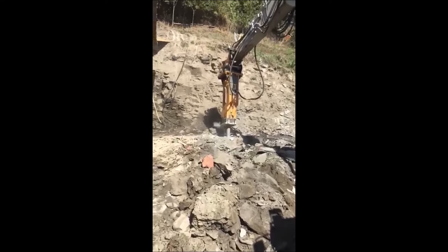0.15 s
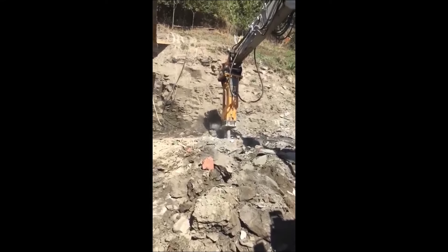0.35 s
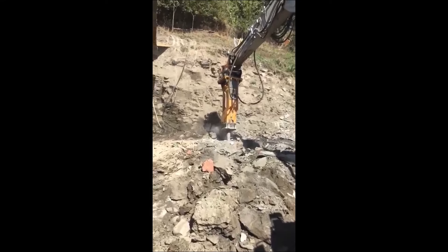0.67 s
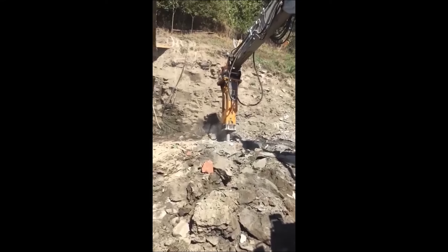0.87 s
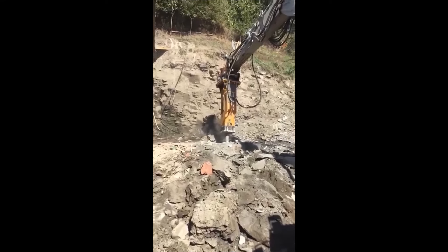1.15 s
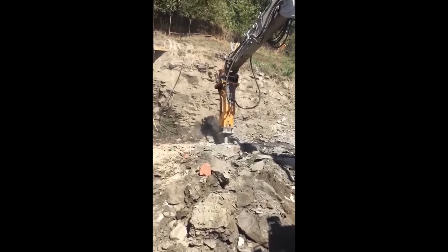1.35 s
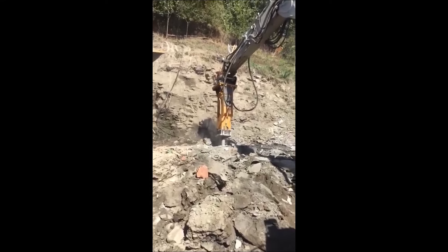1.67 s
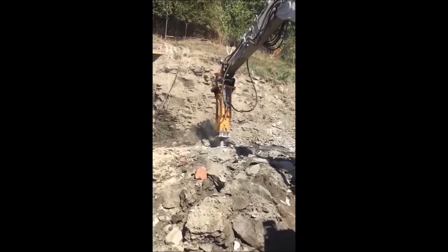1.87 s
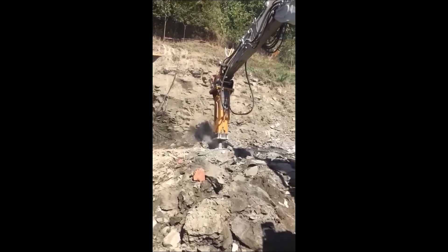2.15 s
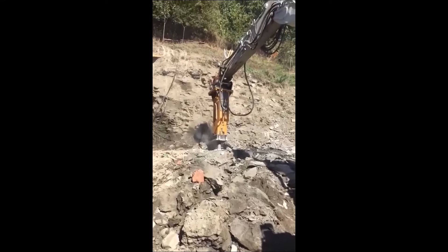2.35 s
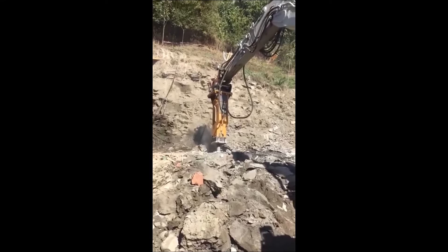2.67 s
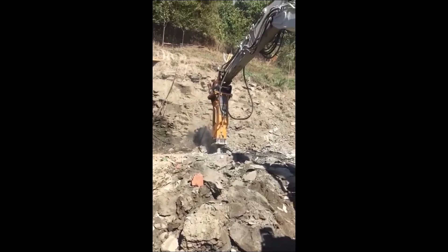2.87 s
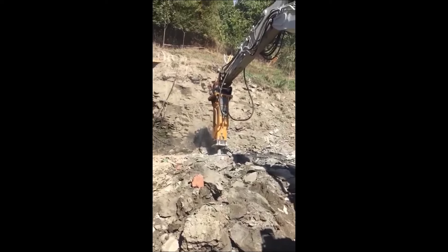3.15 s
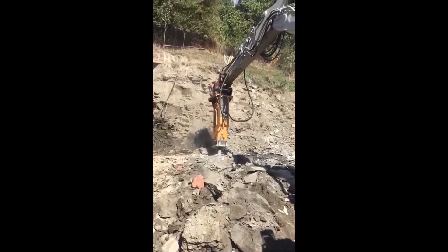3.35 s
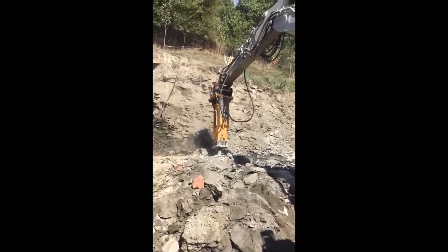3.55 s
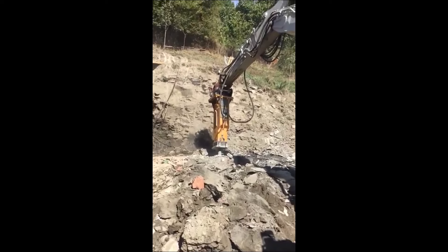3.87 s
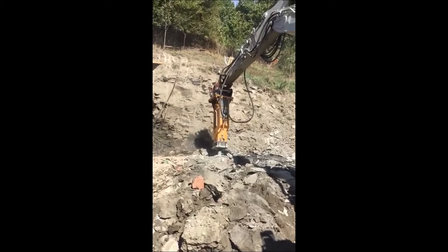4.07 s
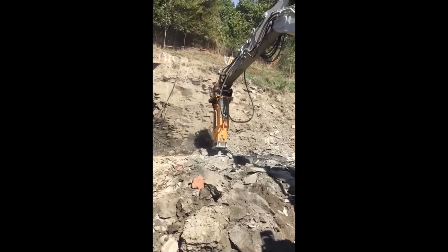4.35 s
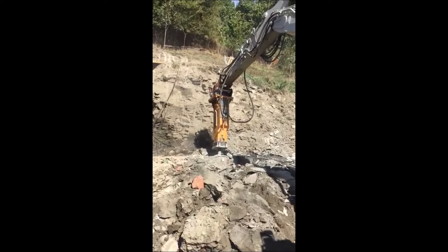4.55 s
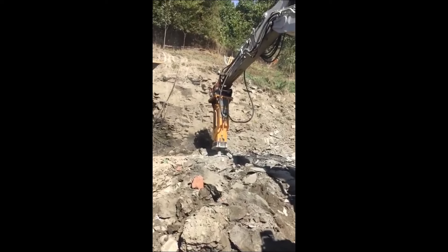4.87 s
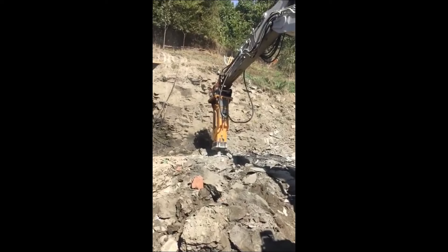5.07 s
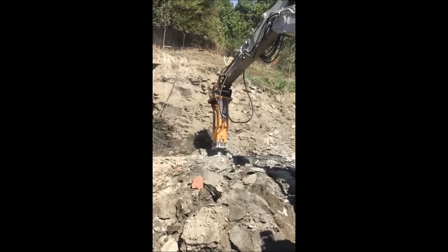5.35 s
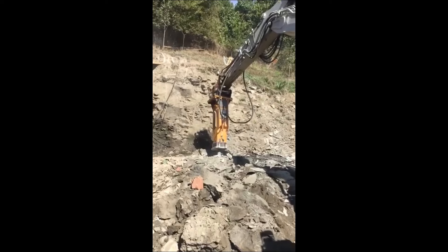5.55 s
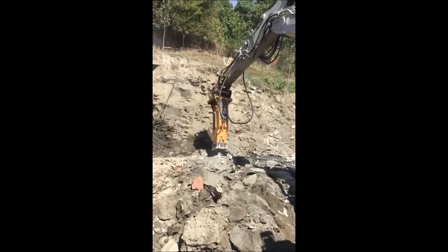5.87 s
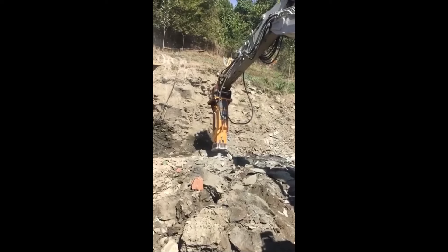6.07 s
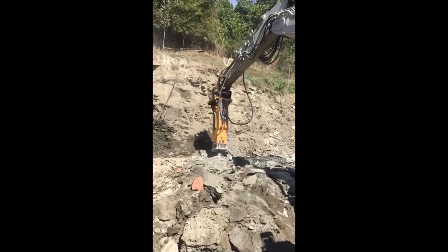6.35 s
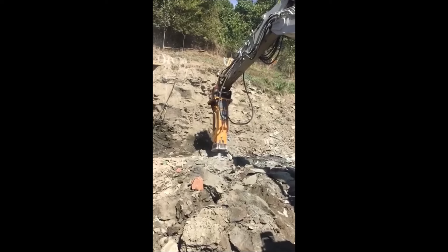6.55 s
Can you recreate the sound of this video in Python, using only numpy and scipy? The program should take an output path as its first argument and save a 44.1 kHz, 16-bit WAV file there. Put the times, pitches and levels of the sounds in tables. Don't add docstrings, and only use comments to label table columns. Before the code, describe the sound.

A hydraulic breaker on a small excavator hammers rock about eight times a second, metallic and clattering, over a droning diesel and hissing oil.

```python
import sys
import numpy as np
from scipy import signal
from scipy.fft import rfft, irfft
from scipy.io import wavfile
from scipy.ndimage import uniform_filter1d, minimum_filter1d

SR = 44100
rng = np.random.default_rng(int(sys.argv[2]) if len(sys.argv) > 2 else 0)


def elevation(decibels):
    levels = np.asarray(decibels, float)
    return 10 ** (levels / 20)


def to_wav(s):
    ch = np.atleast_2d(s).T
    pcm = np.round(np.clip(ch, -1, 1) * 32767)
    wavfile.write(sys.argv[1], SR, pcm.astype(np.int16))


N = 295891
RING = int(.24 * SR)
AGE = np.arange(RING) / SR

# pitch_hz, level_db
DRONE_SPECTRUM = [(18, -38), (30, -6), (157, 4), (422, -5), (514, 0.5), (1050, -19.5), (1720, -27),
                  (2500, -29.5), (3900, -31), (4750, -36.5), (5650, -26.5), (8590, -39.5), (11000, -37.5),
                  (14300, -84), (22000, -120)]
# time_s, level_db, centre_hz
OIL_HISS = [
    (0, -46, 3800),
    (.3, -43.5, 3730),
    (1.002, -42, 3764),
    (1.6, -40.5, 3700),
    (1.898, -50.5, 3637),
    (4.6, -55, 3640),
    (5.2, -47, 3764),
    (6.201, -48.5, 3750),
    (6.71, -41, 3670),
]
# offset_hz, level_db
OIL_BAND = [(60, 0.5), (190, -1.5), (360, -20), (900, -37.5)]
# pitch_hz, level_db
OIL_WASH = [(2500, -1.0), (3500, -6), (5000, -10), (6500, -15), (9000, -41)]

# first_blow_s, period_s, blows
STEADY_RUNS = [
    (.0242, .12018, 14),
    (2.2152, .12, 12),
    (3.6551, .11933, 12),
    (5.087, .1189, 5),
    (5.6815, .11963, 9),
]
# time_s, extra_db
LABOURED_BLOWS = [
    (1.711, 2),
    (1.8472, 2),
    (1.9748, 1.5),
    (2.0966, 1),
]
# time_s, boom_bite_db, housing_slack_db, ground_hardness_db
CHISEL_CONTACT = [(0, -2, 1.5, 4), (.4, -13, -1, 3.5), (.7, 1, -14, 5), (1.35, 0, -6, 6.5),
                  (1.56, -7, -12, 1), (1.72, -7, 0, 3.5), (1.85, 4, -6, -9), (2.1, -1.5, -7, 1),
                  (2.331, -5.5, -10, 3), (2.6, 0, -4.5, -1), (3.3, 4.5, -2, 0.5), (3.75, 2, -2.5, -.5),
                  (4.4, 1.5, 2, -1.5), (4.95, 6, 2, 3.5), (5.25, 4.5, 5, 0.5), (5.7, 0, 2, -2.5),
                  (6.3, 4.5, -2, -0.5), (6.55, 3, -5, -1.5)]
PART_SCATTER = [3, 1.15, 3.2, 2.6]
SEATINGS = [
    .8,
    2.7,
    5.1,
]

# pitch_hz, first_seating_db, second_seating_db,
# third_seating_db
STEEL_MODES = [(871,-19,-1.5,-15.5),(913.4,-9,-3.5,-10.5),(1086,-14.5,-10,-20.5),(1231,-17.5,-5,-7.5),(1320,-10,-4,2.5),(1384,-6,-13,-2),(1442,-3,-6,-6.5),(1546,-5,4,-32),(1707,-3.5,-1,0),(1875,-12.5,-6,-1.5),(2091,-17.5,-18.5,-16.5),(2706,-7.5,-5.5,-15.5),
               (3067,-18.5,-9,-11.5),(3223,-32,-9,-17.5),(3450,-47,-24,-23),(3731,-25,-9,-8.5),(3900,-7.5,-3,-1.5),(4120,-9,-6.5,-17),(4230,-6.5,-2.5,-3),(4393,-20,-8.5,-5.5),(5370,-5.5,-11,-13.5),(5560,-5,-4.5,-17.5),(5910,-8.5,-10,-6),
               (6800,-20,-16,-32),(6980,0,0,-47),(7210,-22,-9,-9),(7510,-14,-14,-6.5),(8650,-10,3.5,-24),(8536,4,-27,0.5),(9920,-8.5,-15,-14)]
# pitch_hz, t60_s
STEEL_DECAY = [(900, 0.097), (1350, 0.036), (1800, 0.088), (2700, 0.097), (3300, .09), (4000, 0.09),
               (6000, 0.052), (8500, 0.026)]
# pitch_hz, arrival_ms
STEEL_FILL = [(900, 4), (1250, .6), (1800, .5), (2700, .8), (3200, 9), (3800, 4), (4200, .8), (8000, .3)]
# pitch_hz, t60_s, arrival_ms, first_seating_db, second_seating_db, third_seating_db
BOOM_MODES = [(502.8, 0.21, 3.5, -2.5, 0.5, -4.5), (553, 0.13, 4.9, -0.5, -1.5, -5),
              (618, 0.34, 12, -6.5, -37, -20), (605, 0.038, 1.4, -5, -33, -2),
              (701, 0.071, 15, -11, -37, -17)]
HOUSING_MODES = [(330.6, 0.045, 14.7, 2.5, 2.5, 3.5), (411.5, 0.1, 12, -23, -13, -11)]
GROUND_MODES = [(131, 0.23, 30, -25, -49, -38.5), (91.2, 0.031, 29, -0.5, 5.5, 7.5),
                (158.5, 0.08, 58, -3.5, 6, 3.5), (205, 0.13, 5.8, -3.5, 1, -6),
                (260.5, 0.061, 22, -5, -13, -1.5)]
# pitch_hz, level_db (per Hz)
CLATTER_SPECTRUM = [(500, -6), (800, -10), (1040, -12.5), (1700, -13), (2440, -14.5), (3300, -12.5),
                    (4040, -7.5), (4800, -17.5), (5530, -11.5), (7000, -16), (7950, -20.5), (8730, -20),
                    (10200, -32), (12000, -43.5)]
CRACK_SPECTRUM = [(900, -38), (1500, 23), (3000, -44), (6000, -24.5), (8500, 7), (10500, -7), (12000, 2.5),
                  (13500, -58)]
KNOCK_SPECTRUM = [(700, -20.5), (1500, 5), (2500, -6), (3300, -1), (4200, -0.5), (6500, -8), (9000, -8.5),
                  (12000, -16)]
# pitch_hz, t60_s
CLATTER_DECAY = [(400, 0.34), (1000, 0.25), (2500, 0.23), (4000, 0.17), (6500, 0.12), (9500, 0.11)]
KNOCK_DECAY = [(500, 0.092), (9000, 0.57)]

# low_hz, high_hz, threshold_db
MUTED_BANDS = [(7800, 8300, -64), (8800, 9400, -67), (9400, 10100, -64), (10100, 10700, -61),
               (10700, 11300, -58), (11300, 12000, -66), (12000, 13100, -55), (13100, 17000, -52)]
# low_hz, high_hz, share_of_frames, side_db
FILLED_BANDS = [(1000, 1200, .3, -22), (1300, 1550, .3, -23), (1700, 2000, .35, -23), (2100, 2400, .3, -23),
                (2500, 2800, .35, -23), (2900, 3200, .3, -22), (4100, 4900, .65, -5), (4900, 6200, .9, -2),
                (6200, 7700, .85, -2), (7700, 8800, .7, -3), (8800, 9600, .75, -3), (9600, 10400, .5, -2),
                (11200, 12200, .6, -1)]


def on_log(hz, table):
    f, value = np.transpose(table)
    return np.interp(np.log(np.maximum(hz, 1)), np.log(f), value)


def colour(x, table):
    n = x.shape[-1]
    gain = elevation(on_log(np.fft.rfftfreq(n, 1 / SR), table))
    y = irfft(rfft(x) * gain, n)
    return y / np.sqrt(np.mean(y ** 2))


def fade(t60):
    return np.exp(-np.log(1000) * AGE / t60)


def walk(rate):
    hold = int(SR / rate)
    steps = np.repeat(rng.standard_normal(N // hold + 1), hold)
    return np.sqrt(2) * uniform_filter1d(uniform_filter1d(steps, hold), hold)[:N]


def place(times, rings):
    out = np.zeros(N + RING)
    for s, ring in zip(times, rings):
        i = max(int(s * SR), 0)
        out[i:i + RING] += ring
    return out[:N]


def blow_times():
    runs = [(first + period * k, 0) for first, period, count in STEADY_RUNS for k in range(count)]
    return np.transpose(sorted(runs + LABOURED_BLOWS))


def engine():
    t, blow_s = np.arange(N) / SR, blow_times()[0]
    beat = np.r_[2 * blow_s[0] - blow_s[1], blow_s, 2 * blow_s[-1] - blow_s[-2]]
    blows_done = uniform_filter1d(np.interp(t, beat, np.arange(len(beat))), size=2000, mode="nearest")
    turn = 2 * np.pi * 7 * blows_done
    labour_s, rise_s, fall_s = 1.84, 0.23, .08
    labour = np.exp(-((t - labour_s) / np.where(t < labour_s, rise_s, fall_s)) ** 2)
    firing_db = -36.5 + 10.5 * labour
    firing = np.sqrt(2) * elevation(firing_db) * (np.sin(turn + 1.8) + elevation(-12) * np.sin(2 * turn + .4))
    pump = elevation(-39) * np.sin(9 * turn / 2) + elevation(-45) * np.sin(9 * turn)
    drone = colour(rng.standard_normal(N), DRONE_SPECTRUM)
    drone = drone * (1 + 0.23 * np.cos(turn)) * elevation(0.58 * walk(14))
    return firing + pump * elevation(2 * walk(10)) + elevation(-30.5) * drone


def oil():
    s, *columns = np.transpose(OIL_HISS)
    level_db, centre_hz = (np.interp(np.arange(N) / SR, s, c) for c in columns)
    carrier = np.sin(2 * np.pi * np.cumsum(centre_hz * (1 + .008 * walk(14))) / SR)
    band = np.sqrt(2) * carrier * colour(rng.standard_normal(N), OIL_BAND)
    wash = colour(rng.standard_normal(N), OIL_WASH)
    return elevation(level_db + 1.2 * walk(20)) * (band + elevation(-8) * wash)


def contact(s):
    t, *controls = np.transpose(CHISEL_CONTACT)
    bite, slack, hard = (np.interp(s, t, c) for c in controls)
    chance = rng.standard_normal((len(s), 5)).T
    bright = 2.5 + 0.25 * hard
    parts = np.array([bite, slack, hard, bright])
    force_db = -4.5 - 0.11 * np.maximum(bite, 0) + 0.55 * chance[-1]
    return force_db, *(parts + np.array(PART_SCATTER)[:, None] * chance[:-1])


def modes(times, hz, t60, arrival_ms, seat_db, scatter_db, detune, sag=0):
    rings, start = 0, rng.random(len(hz)) * 2 * np.pi
    chance = rng.standard_normal((len(times), len(hz), 2))
    chance = np.sqrt(3) * uniform_filter1d(chance, size=3, axis=0)
    sag_s = .025
    bent_age = AGE + sag * sag_s * (1 - np.exp(-AGE / sag_s))
    for k, f in enumerate(hz):
        db = np.interp(times, SEATINGS, seat_db[k]) + scatter_db * chance[:, k, 0]
        swell = 1 - np.exp(-(AGE * 1000 / arrival_ms[k]) ** 2)
        shape = swell * fade(t60[k])
        turn = 2 * np.pi * f * np.outer(1 + detune * chance[:, k, 1], bent_age)
        rings = rings + elevation(db)[:, None] * shape / shape.max() * np.sin(turn + start[k])
    return rings


def rattle(count, spectrum, t60s, alike, rise_ms, clump_db):
    keep = np.clip(alike, 0, .98)
    noise = rng.standard_normal((count + 8, RING))
    noise = signal.lfilter([np.sqrt(1 - keep ** 2)], [1, -keep], noise, axis=0)[8:]
    spec, f = rfft(colour(noise, spectrum)), np.fft.rfftfreq(RING, 1 / SR)
    rings = 0
    for hz in 300 * 2 ** np.arange(0, 6, .5):
        share = np.clip(1 - 2 * np.abs(np.log2(np.maximum(f, 1) / hz)), 0, 1)
        steps = np.repeat(rng.standard_normal((count, RING // 128 + 1)), 128, axis=1)
        clumps = uniform_filter1d(steps, size=128)[:, :RING]
        rings = rings + irfft(spec * share, RING) * fade(on_log(hz, t60s)) * elevation(clump_db * clumps)
    return rings * (1 - np.exp(-AGE * 1000 / rise_ms))


def heavy_part(table, times):
    hz, t60, arrival_ms, *seat_db = np.transpose(table)
    return modes(times, hz, t60, arrival_ms, np.transpose(seat_db), scatter_db=.8, detune=.004, sag=0.059)


def ground(s, ground_db):
    thud = elevation(ground_db - 22.5)[:, None] * heavy_part(GROUND_MODES, s)
    push = (AGE / .018) ** 2 * np.exp(2 - 2 * AGE / .018)
    return thud + elevation(-25.0) * push * np.sin(2 * np.pi * 74 * AGE)


def valve_knock(count):
    return elevation(-39.0) * rattle(count, KNOCK_SPECTRUM, KNOCK_DECAY, alike=0.37, rise_ms=0.59, clump_db=5.5)


def steel(s, bright_db):
    hz, *seat_db = np.transpose(STEEL_MODES)
    t60, arrival_ms = on_log(hz, STEEL_DECAY), on_log(hz, STEEL_FILL)
    ring = modes(s, hz, t60, arrival_ms, np.transpose(seat_db), scatter_db=3, detune=.003)
    clatter = rattle(len(s), CLATTER_SPECTRUM, CLATTER_DECAY, alike=.8, rise_ms=3, clump_db=3.2)
    crack = colour(rng.standard_normal((len(s), RING)), CRACK_SPECTRUM) * fade(0.018)
    metal = elevation(-16) * ring + elevation(-12.5) * clatter + elevation(-25.0) * crack
    top = signal.sosfilt(signal.butter(2, 4800, "high", fs=SR, output="sos"), metal)
    return metal + (elevation(bright_db) - 1)[:, None] * top


def breaker():
    s, extra_db = blow_times()
    force_db, boom_db, housing_db, ground_db, bright_db = contact(s)
    boom = elevation(boom_db - 17)[:, None] * heavy_part(BOOM_MODES, s)
    housing = elevation(housing_db - 17.0)[:, None] * heavy_part(HOUSING_MODES, s)
    blow = steel(s, bright_db) + boom + housing + ground(s, ground_db)
    force = elevation(force_db + extra_db)[:, None]
    return place(s - .001, force * blow) + place(s - .0205, force * valve_knock(len(s)))


def scene():
    mid = engine() + oil() + breaker()
    return np.array([mid, mid])


def flickering_bands(x):
    f, _, spec = signal.stft(x, SR, nperseg=1024)
    for low_hz, high_hz, floor_db in MUTED_BANDS:
        band = (f >= low_hz) & (f < high_hz)
        size = np.sqrt(np.sum(np.abs(spec[band]) ** 2, axis=0))
        margin = size / elevation(floor_db + 1.5 * rng.standard_normal(len(size)))
        spec[band] *= margin ** 6 / (1 + margin ** 6)
    side, frames = np.zeros_like(spec), spec.shape[1]
    treble = np.abs(spec[f > 4000]).sum(axis=0)
    calm = (treble < 1.5 * np.roll(treble, 2)) | (rng.random(frames) < .14)
    for low_hz, high_hz, share, side_db in FILLED_BANDS:
        band = (f >= low_hz) & (f < high_hz)
        on = np.repeat(rng.random(frames // 4 + 1) < share, 4)[:frames] & calm
        wander = np.repeat(rng.standard_normal(frames // 2 + 1), 2)[:frames]
        gain = on * elevation(side_db + 3.5 * wander)
        random_phase = np.exp(2j * np.pi * rng.random(spec[band].shape))
        side[band] = gain * np.abs(spec[band]) * random_phase
    return signal.istft(np.array([spec + side, spec - side]), SR, nperseg=1024)[1][:, :N]


def low_pass(x):
    return signal.sosfilt(signal.butter(12, 13100, fs=SR, output="sos"), x)


def record(dry):
    x = signal.sosfilt(signal.butter(4, 42, "high", fs=SR, output="sos"), dry[0])
    size = uniform_filter1d(-minimum_filter1d(-np.abs(x), size=300), size=300)
    x = x * np.minimum(1, .34 / size) ** .45
    rounded = np.tanh(1.399 * x) / 1.237
    return low_pass(flickering_bands(rounded))


dry = scene()
out = record(dry)
to_wav(out)
```